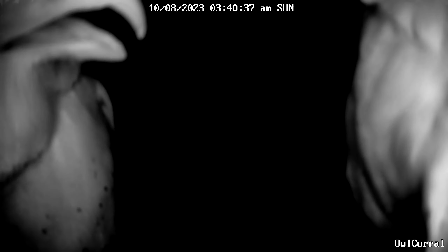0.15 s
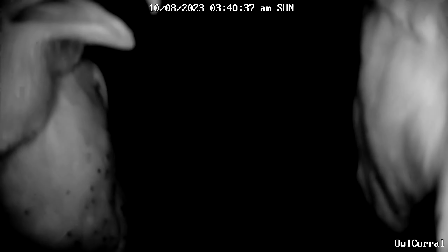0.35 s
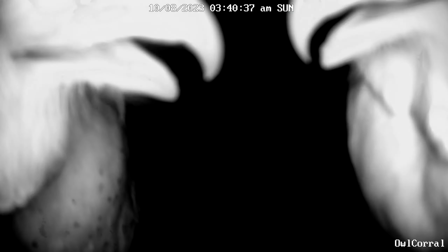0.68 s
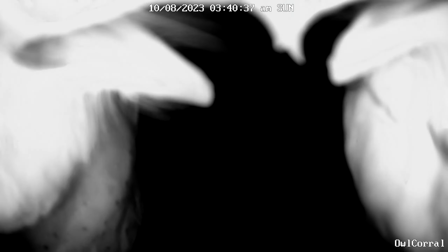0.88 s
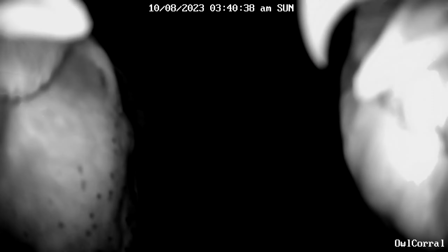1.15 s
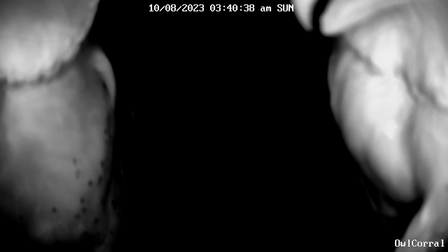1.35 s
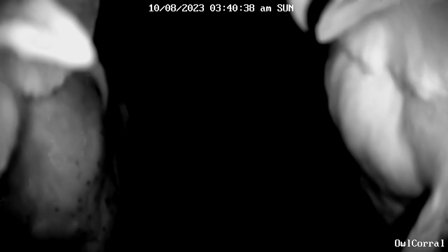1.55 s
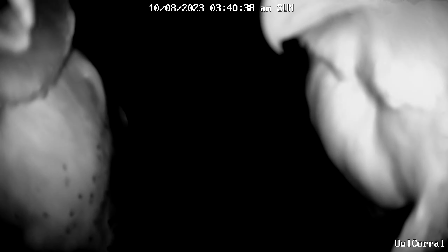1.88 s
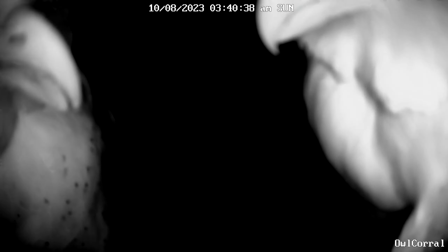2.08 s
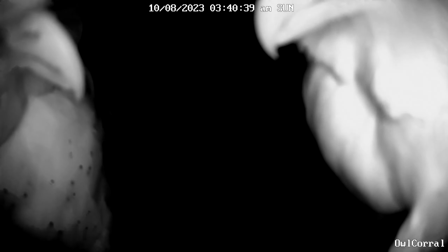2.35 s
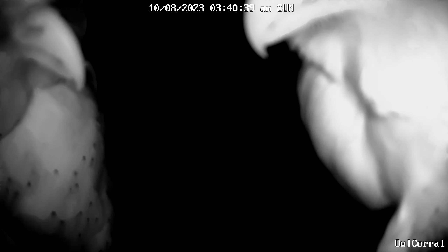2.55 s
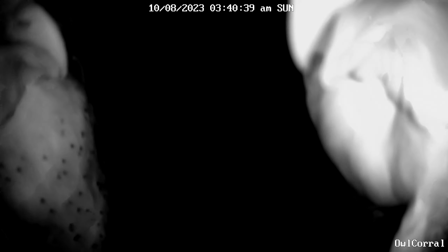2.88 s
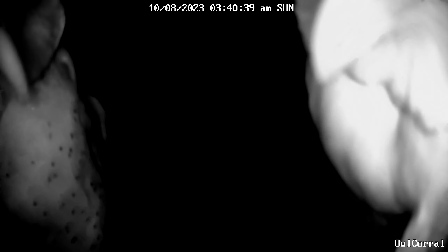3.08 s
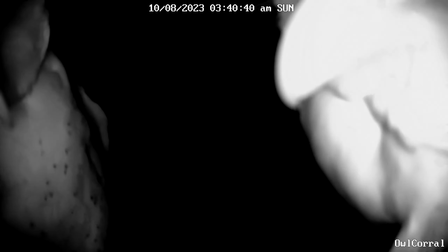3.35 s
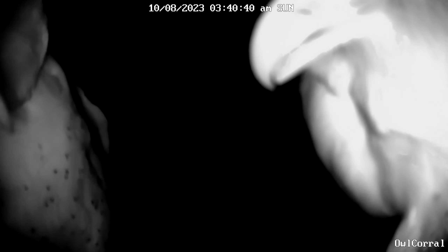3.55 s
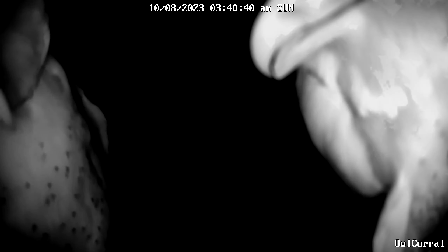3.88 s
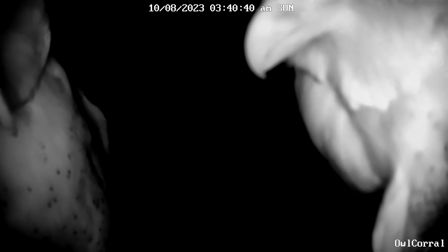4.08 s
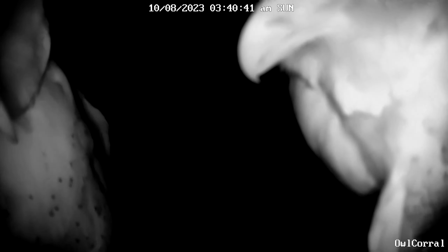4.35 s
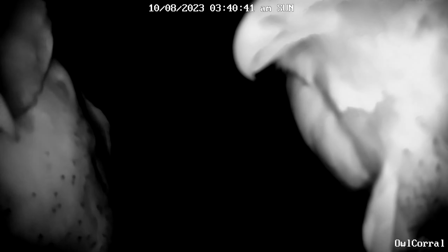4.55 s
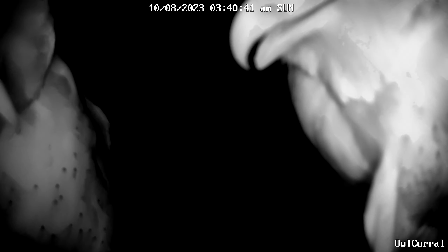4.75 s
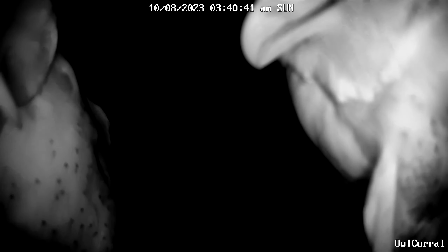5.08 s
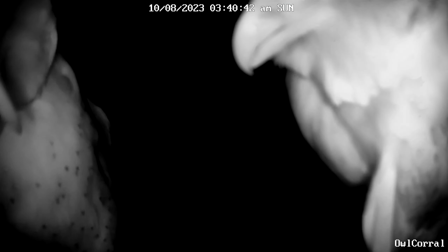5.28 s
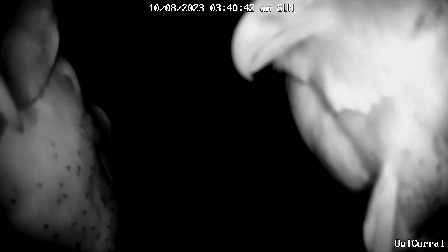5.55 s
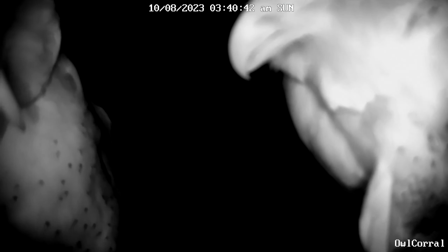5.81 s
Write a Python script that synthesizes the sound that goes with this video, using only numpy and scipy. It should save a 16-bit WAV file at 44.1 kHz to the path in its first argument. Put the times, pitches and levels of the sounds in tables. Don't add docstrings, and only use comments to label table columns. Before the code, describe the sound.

Inside a small wooden nest box, two owls jostle against a very close microphone. From 0 to 0.6 s, feathers scrape in crackly grains, claws tick, bodies bump with low thuds, and tiny mews and squeaks peep through; a bright snap and squeak land near 0.5. Scattered clicks and short squeaks follow at 0.7-0.9, with a heavy soft shove and piercing chirp around 1.0-1.1. From 1.2 to 2.2 s comes the loudest burst: clipped squeaks, low rising croaks, sharp bill cracks and hard knocks around 1.6-2.1, some overloading. Clicks with lower squeaks sound near 2.4 and 2.6. Then mostly faint hum, pulsing hiss and slight box movement. Small squeaks, clicks and feather brushes return at 3.8-4.2, with a sharp pop near 4.15, and fainter ones at 4.65 and 4.85. A tiny tick near 5.6 ends it. Dry, short boxy reverberation, muffled, switching treble.

```python
import sys
import numpy as np
from scipy import signal
from scipy.fft import rfft, irfft, next_fast_len
from scipy.io import wavfile
from scipy.ndimage import uniform_filter1d

SR = 44100
rng = np.random.default_rng(int(sys.argv[2]) if len(sys.argv) > 2 else 0)


def volts_from_db(level):
    exponent = np.asarray(level, float) / 20
    return 10 ** exponent


def dump_mix(stems):
    frames = np.atleast_2d(stems).T
    limited = np.clip(frames, -1, 1)
    pcm = np.round(limited * 32767).astype(np.int16)
    wavfile.write(sys.argv[1], SR, pcm)


N = 261513
TIME = np.arange(N) / SR

# (frequency [Hz], level [dB])
NIGHT = [(12, -24.5), (20, 2), (129, -7.5), (239, -19.5), (1360, -28.5), (7500, -36.5), (9000, -58.5),
         (19800, -120)]
# (from [s], to [s])
WIDE_SPANS = [(.530, .728), (1.297, 1.430), (1.745, 1.880), (2.132, 2.390), (2.449, 2.580), (2.643, 3.735),
              (3.859, 4.121), (4.178, 4.628), (4.690, 4.822), (4.882, 5.93)]
# (time [s], peak [dB])
SEAMS = [(.457, -55), (.520, -55), (1.2424, -53), (1.2482, -47), (1.2511, -47), (1.2975, -38),
         (1.4735, -58), (1.6175, -56), (1.634, -58), (4.181, -64)]
# (low edge [Hz], high edge [Hz])
EDGE_HZ = [3400, 4750]
# (frequency [Hz], level [dB])
HAZE = [(300, -15.5), (900, -1.0), (2000, 0), (4200, -5.5), (6000, -17), (9000, -25.5)]

# (time [s], panel peak [dB], box peak [dB])
KNOCKS = [
    (0.709, -38, -41),
    (1.993, -41.5, -44.5),
    (1.301, -40.5, -40),
    (1.6258, -12, -28),
    (1.7972, -14, -29.5),
    (2.1265, -17, -31),
    (1.093, -38, -45),
    (1.218, -38, -45),
    (1.437, -40, -45),
    (1.521, -36, -48),
]
# (time [s], panel peak [dB], box peak [dB])
SHOVES = [(0.036, -62, -47), (0.244, -40, -23.5), (0.337, -39, -32.5), (0.428, -36, -31), (0.534, -23, -26),
          (.548, -32, -25), (.728, -53.5, -40.5), (.795, -53, -46.5), (.9, -58, -46.5), (0.968, -24, -23),
          (0.979, -25, -17), (1.019, -41.5, -30.5), (1.067, -42, -46), (1.215, -39.5, -37.5),
          (1.436, -39, -35.5), (1.697, -29, -25), (3.82, -56, -59)]
# (frequency [Hz], level [dB], decay T60 [s])
HOUSING_MODES = [(268.4, 6, 0.09), (294, -5, 0.062), (215, -3, 0.05), (175, -8, .06), (406.2, -13, 0.12),
                 (507, -7.5, 0.046), (700, -17.5, 0.013), (1100, -12, 0.05), (1620, -20, 0.026)]
# (frequency [Hz], level [dB], decay T60 [s])
PANEL_MODES = [(280, 5, .09), (325, -2, .11), (178, -2, .13), (477, -7, .09)]
# (frequency [Hz], level [dB], decay T60 [s])
BOX_MODES = [(146, 8, 0.09), (118.7, -2, 0.16)]
# (time [s], held [s], level [dB])
SWAY = [(.04, .01, -41.5), (.25, .005, -29), (.4, 0.038, -45), (.58, 0.0077, -49.5), (.98, 0.036, -28.5),
        (1.09, 0.062, -39), (1.47, .005, -52), (1.66, 0.098, -22), (1.86, 0.072, -24),
        (2.16, 0.0099, -34.5), (2.06, .04, -54), (2.26, 0.18, -54.5), (2.7, 0.0048, -56)]
# (time [s], held [s], level [dB])
SETTLE = [
    (2.45, 0.22, -55),
    (3.55, 0.044, -63.5),
    (3.82, 0.0096, -64.5),
    (3.97, 0.2, -56.5),
    (4.5, 0.0081, -70.5),
    (4.66, 0.34, -63),
    (5.23, .7, -67),
]
# (frequency [Hz], level [dB])
ROCKING = [(20, -9), (40, -3.0), (75, -2.5), (125, 5.5), (170, -21.5), (350, -16.5), (600, -42.5)]

# (time [s], weight on the box [dB], feather drag [dB])
RUB = [(0, -31.5, -86.5), (.15, -41.5, -53.5), (.28, -44.5, -71), (.37, -39, -53.5), (.43, -40, -64.5),
       (0.554, -30, -56.5), (.64, -54, -73), (.81, -52, -67), (.93, -44.5, -75), (1.06, -34, -65.5),
       (1.13, -52, -72.5), (1.219, -42.5, -75), (1.35, -49, -63), (1.57, -41.5, -68), (1.718, -47, -58.5),
       (1.832, -31.5, -66), (2.05, -56.5, -76), (2.8, -75, -81)]
# (frequency [Hz], level [dB])
RUMBLE = [(15, -31.5), (25, -7), (124, -8), (185, -18), (340, -15.5), (700, -36), (910, -60.5),
          (1540, -120)]
# (frequency [Hz], level [dB])
RUSTLE = [(400, -15.5), (800, 7.5), (1200, 2.5), (2000, -10.5), (3000, -14.5)]
# (frequency [Hz], level [dB])
FIZZ = [(1500, -7), (2500, 4.5), (4500, 3), (6500, 3.5), (8000, -6), (9000, -26.5)]
# (time [s], held [s], level [dB], treble [dB])
SWEEPS = [
    (2.099, 0.014, -70, -65),
    (3.25, .11, -67, -71.5),
    (3.419, 0.11, -74, -85.5),
    (4.019, 0.0057, -72, -74.5),
    (4.069, 0.027, -65.5, -66.5),
    (5.0, 0.23, -78.5, -91.5),
    (5.29, 0.046, -72.5, -85),
    (5.37, 0.036, -66.5, -86),
]
# (time [s], held [s], level [dB], treble [dB])
FLICKS = [(1.307, 0.058, -61.5, -44.5), (1.524, 0.025, -77, -68), (1.678, 0.027, -59, -71),
          (1.745, 0.033, -65, -51), (2.132, 0.058, -54, -81), (3.545, 0.0052, -62, -86),
          (3.865, 0.028, -70, -63), (4.14, 0.0041, -54.5, -65), (4.19, .005, -83.5, -89),
          (4.482, 0.017, -69, -91), (4.9, 0.0036, -72, -77), (5.612, 0.018, -65, -87)]
# (frequency [Hz], level [dB])
HOLLOW = [(500, -17.5), (750, -1.5), (1000, 4.0), (1300, -3.0), (1900, -5.5), (2900, -16.0)]
# (time [s], held [s], level [dB], band centre [Hz])
RASPS = [(.03, 0.0035, -58, 3200), (.088, 0.01, -55.5, 1850), (.19, 0.016, -52.5, 2600),
         (.33, 0.0089, -49, 2980), (0.383, 0.0064, -52, 2200), (0.42, .016, -60.5, 3800),
         (.56, 0.018, -57, 1500), (0.871, 0.013, -60, 4000), (1.475, 0.012, -51, 3250),
         (1.528, 0.018, -44, 3800), (1.63, 0.0049, -38.5, 1184), (1.315, .06, -54, 1700),
         (1.69, .03, -52.5, 3900), (1.75, 0.0077, -48, 2200), (2.137, 0.024, -63.5, 2400),
         (3.864, 0.063, -72, 2580), (3.865, 0.053, -71, 1300), (4.07, 0.041, -63, 2640),
         (.533, 0.0074, -44.5, 5400), (.557, .012, -51, 5800), (.54, 0.049, -60.5, 4300),
         (1.008, .008, -59.5, 3000), (.972, .006, -56, 2000), (0.743, 0.0033, -43, 5200),
         (0.798, 0.0036, -46, 4800), (1.40, 0.014, -48, 6000), (2, 0.059, -69.5, 1600),
         (.22, 0.042, -58.5, 1240), (.44, 0.0096, -57.5, 2540), (1.927, 0.012, -57, 2680),
         (1.997, 0.013, -52, 3800), (1.999, 0.0075, -54.5, 2000), (1.915, 0.0048, -46, 1700),
         (1.525, .012, -50.5, 1604), (1.748, 0.0061, -50, 6980), (4.481, 0.012, -60, 830),
         (5.612, 0.022, -64, 910), (4.66, 0.01, -52, 2100)]

# (time [s], peak [dB], dull part [dB])
SNAPS = [(.128, -44, -37), (0.184, -44.5, -31.5), (0.4536, -30, -31.5), (0.4592, -22, -22),
         (0.5256, -16, -27.5), (1.0934, -22.5, -18.5), (1.4102, -26, -50), (1.7384, -21, -32.5),
         (1.7954, -28, -17), (1.849, -46, -50), (1.994, -23, -24.5), (2.1245, -30.5, -22.5),
         (2.423, -16, -19.5), (2.6047, -44, -29.5), (3.8241, -48, -34.5), (3.8574, -27, -37),
         (3.865, -59, -42), (4.0437, -47.5, -41), (4.1556, -25.5, -24), (4.6702, -73, -38)]
# (time [s], peak [dB], dull part [dB])
TICKS = [(0.0403, -57, -41), (0.0566, -46, -30), (0.1453, -30.5, -29), (0.3043, -48, -46), (.385, -51, -43),
         (0.39, -49, -49), (0.5044, -41.5, -40.5), (0.7135, -58.5, -34.5), (0.7929, -43, -40),
         (0.8645, -33.5, -30.5), (0.9697, -47, -43.5), (1.0678, -51, -51), (1.1653, -83, -72),
         (1.3042, -20.5, -35.5), (1.4003, -41.5, -68.5), (1.5206, -26, -35.5), (1.5815, -70, -47.5),
         (1.6242, -24, -14.5), (1.6766, -26, -32.5), (2.0576, -76, -75), (2.6131, -25.5, -35),
         (3.5432, -75, -57), (4.48, -78, -56.5), (4.866, -41.5, -43.5), (5.6106, -75.5, -60)]
# (time [s], peak [dB], dull part [dB])
STROKES = [(0.0044, -56, -40), (0.0248, -31, -35), (0.09, -57, -38.5), (0.124, -42.5, -33.5),
           (0.1966, -45, -36), (0.209, -50, -44.5), (0.3255, -24.5, -27.5), (0.34, -44.5, -39),
           (0.349, -48, -60), (0.3635, -58, -55), (0.4417, -48.5, -33.5), (0.49, -55, -55),
           (0.5545, -68.5, -26.5), (0.845, -36.5, -33), (0.875, -58, -28.5), (0.904, -53, -42.5)]
# (frequency [Hz], level [dB])
BRIGHT = [(1200, -4.5), (1900, -2.5), (3000, 1), (4500, 3), (7000, -3.0), (9000, -23.0)]
# (frequency [Hz], level [dB])
DULL = [(130, -30.5), (300, 0.5), (600, -6.0), (1200, 6.0), (2000, -12.5), (3000, -29.5)]
# (time [s], peak [dB], width [ms])
PULLS = [
    (.1848, -20, 0.1),
    (.4600, -41.5, 0.53),
    (1.9945, -19, 0.21),
]
# (time [s], peak [dB], width [ms])
PUSHES = [(.0580, -31, 0.57), (.7125, -25, 0.54), (.7152, -24.5, 0.49), (1.4012, -43, 0.27),
          (1.5825, -36, 0.34), (2.058, -46.5, 0.38), (3.545, -47.5, 0.11), (3.8238, -37.5, 0.44),
          (3.9195, -50, 0.63), (4.1561, -12, 0.12), (4.482, -53.5, 0.34), (4.8690, -36, 0.083),
          (5.612, -51, 0.31)]
# (time [s], peak [dB], width [ms])
CRACKS = [
    (1.3045, -10.5, 0.11),
    (1.5215, -8.5, 0.12),
    (1.6245, -11.5, 0.13),
    (1.6772, -18.5, 0.15),
    (1.7384, -9, 0.11),
    (1.7957, -12.5, .06),
    (2.1252, -17, 0.12),
    (2.2008, -27, 0.19),
]

# (centre time [s], length [ms], middle pitch [Hz], peak [dB])
CROAKS = [
    (1.2201, 8, 1096, -19),
    (1.4397, 7.8, 1100, -18),
    (1.655, 8.4, 1117, -15),
    (1.9009, 8, 1131, -19),
    (2.1839, 8.2, 1416, -19),
    (2.3977, 6.1, 1080, -23),
    (2.5899, 6.15, 1075, -22),
    (4.8475, 6.9, 1136, -26),
]
# (centre time [s], length [ms], middle pitch [Hz], peak [dB])
LIFTS = [(.437, 3.7, 2220, -42), (.528, 6.5, 4180, -15), (1.247, 6.3, 3256, -7.5), (1.3064, 3.5, 3774, -6),
         (1.4666, 5.2, 3100, -11.5), (1.5233, 3.8, 3700, -2.2), (1.9036, 7.9, 2540, -27),
         (1.908, 6.7, 2970, -28.5), (1.9956, 3.6, 2980, -16), (2.202, 3.2, 1782, -28.5),
         (4.047, 12.7, 3010, -36), (4.861, 16, 2750, -31.5)]
# (centre time [s], length [ms], middle pitch [Hz], peak
# [dB])
HOLDS = [(.077, 20, 4460, -52), (.405, 7.2, 4300, -38), (.4645, 11, 4440, -19), (.5338, 9.2, 4740, -16.5),
         (.7786, 5.9, 2120, -44), (.8663, 6.3, 3310, -16.5), (1.0957, 3.8, 3640, -6),
         (1.9135, 11, 3080, -19), (1.9205, 8.1, 2930, -14), (2.4196, 4, 2033, -16.5),
         (2.4228, 9.7, 1492, -17.5), (2.61, 10, 2380, -20), (3.786, 9.4, 2615, -32),
         (3.7945, 9.2, 2466, -24), (3.8486, 14, 3570, -31.5), (3.858, 6, 4230, -25), (4.054, 12, 6300, -55),
         (3.863, 5, 5500, -39.5), (3.863, 5, 7200, -41), (2.4047, 6, 2350, -42.5), (4.056, 16, 3110, -34),
         (4.151, 9.2, 3132, -28), (4.664, 16.3, 2770, -35.5), (4.675, 8.9, 2654, -28.5),
         (4.8709, 20, 2906, -32.5)]
# (centre time [s], length [ms], middle pitch [Hz], peak [dB])
DROOPS = [(.1474, 14, 4330, -32.5), (.2852, 5, 3370, -47), (1.41, 9.4, 4440, -28.5), (1.416, 9, 3800, -38),
          (1.4222, 8, 3275, -25.5), (1.4175, 13, 7130, -31.5), (4.065, 6.2, 5640, -44.5),
          (.492, 20, 3900, -53), (1.6253, 4, 4100, -15), (1.745, 9, 3826, -21.5), (2.1258, 4, 4000, -10),
          (2.4142, 9.5, 2410, -21.5), (2.6036, 9.6, 2420, -25.5), (3.8417, 13.8, 4083, -32.5),
          (3.858, 7.35, 1484, -24.5), (4.0645, 8, 2803, -26), (4.143, 8.3, 3540, -38),
          (4.158, 8, 2463, -24), (4.879, 10.7, 2257, -35), (4.886, 7.3, 1600, -42)]
# (centre time [s], length [ms], middle pitch [Hz], peak [dB])
DIVES = [
    (.742, 7.5, 3300, -31.5),
    (.801, 5.7, 2860, -17.5),
    (1.0325, 9.9, 3555, -17.5),
    (1.2415, 10.7, 3880, -28),
    (1.4616, 7.1, 4020, -23),
    (1.9245, 4.5, 2265, -23.5),
    (2.6181, 4.8, 1752, -13.5),
    (3.8567, 10.2, 3090, -20.5),
    (4.067, 3.8, 2520, -27.5),
]
# (centre time [s], length [ms], middle pitch [Hz], peak [dB])
MEWS = [(.011, 21, 977, -41.5), (.0445, 5.7, 995, -31), (.0585, 5.7, 854, -30), (.130, 7, 1100, -39),
        (.148, 8, 1100, -42), (.175, 9.7, 915, -35), (.307, 5.7, 840, -36), (.332, 12, 924, -37.5),
        (.392, 10, 896, -36.5), (.527, 5.1, 1140, -22), (.541, 5.8, 750, -27.5), (.729, 16, 1480, -56.5),
        (.894, 8.4, 1296, -48), (.91, 14, 880, -49.5), (1.45, 7.7, 1223, -39), (2.130, 12.6, 1138, -22),
        (2.130, 7.2, 1694, -25.5), (2.1875, 7.1, 1460, -32), (2.422, 8.6, 392, -33),
        (3.768, 8.6, 945, -54.5), (3.788, 9, 1001, -44), (4.0344, 8.8, 987, -39.5),
        (4.644, 5.7, 950, -53.5), (4.661, 5, 960, -45), (4.671, 8, 910, -48.5)]
# (centre time [s], length [ms], middle pitch [Hz], peak [dB])
YAPS = [
    (1.7407, 5.2, 3600, -3.4),
]
# (notes, end over start pitch [ratio], how soon the glide levels off [exponent],
# overtones [dB], place of the peak [exponent, small = early])
KINDS = [
    (CROAKS, 1.9, 2, 0, 1.3),
    (LIFTS, 1.12, 1, 0, 1),
    (HOLDS, .98, 1, 0, 1),
    (DROOPS, .83, 1, 0, 1),
    (DIVES, .55, 1, 0, 1.4),
    (MEWS, 1.25, 2, -14, 1),
    (YAPS, 1.12, 1, 0, .58),
]
# (pitch [Hz], step between overtones [dB])
OVERTONES = [(1100, -8.5), (2400, -22.5), (3300, -36.5)]
# (frequency [Hz], level [dB])
BREATH = [(500, -8.0), (1200, -3.5), (2500, 0), (4500, -7.0), (9000, -30.5)]
# (low edge [Hz], high edge [Hz])
ECHO_HZ = [1300, 1750]


def colour(x, shape):
    hz, db = np.transpose(shape)
    size = next_fast_len(len(x))
    bins = np.maximum(np.fft.rfftfreq(size, 1 / SR), 1)
    gain = volts_from_db(np.interp(np.log(bins), np.log(hz), db, left=-90, right=-90))
    y = irfft(rfft(x, size) * gain, size)[:len(x)]
    return y / np.sqrt(np.mean(y ** 2))


def band_filter(x, order, hz, kind="bandpass"):
    return signal.sosfilt(signal.butter(order, hz, kind, fs=SR, output="sos"), x)


def walk(rate):
    k = int(SR / rate)
    held = np.repeat(rng.standard_normal(N // k + 1), k)[:N]
    return 0.79 * uniform_filter1d(held, k)


def mottled(x, shape, patchy_db, rate):
    out = 0
    for hz in 500 * 2 ** np.arange(0, 4.5, .5):
        band = band_filter(x, 2, [hz / 2 ** .25, hz * 2 ** .25])
        out = out + volts_from_db(patchy_db * walk(rate)) * band
    return colour(out, shape)


def add(out, s, sound):
    i = int(s * SR)
    out[i:i + len(sound)] += sound[:N - i]


def swells(rows, rise_db_s, fall_db_s):
    gain = 0
    for s, held, db in rows:
        rise_db = rise_db_s * np.maximum(s - TIME, 0)
        fall_db = fall_db_s * np.maximum(TIME - s - held, 0)
        gain = gain + volts_from_db(db - rise_db - fall_db)
    return gain


def ring(modes):
    t = TIME[:SR // 2]
    return sum(volts_from_db(db - 60 * t / t60) * np.sin(2 * np.pi * hz * t) for hz, db, t60 in modes)


def pulse(u, rebound=1):
    return (1 - rebound * u ** 2) * np.exp(-u ** 2 / 2)


def night(level_db=-69.5, tick_db=7, first_s=.34, period_s=.1333):
    since = (TIME - first_s) % 1 % period_s
    ticks = np.exp(-((since - .006) / 0.0073) ** 2)
    noise = colour(rng.standard_normal(N), NIGHT)
    treble = band_filter(noise, 2, 3500, "highpass")
    return volts_from_db(level_db) * (noise + volts_from_db(tick_db) * ticks * treble)


def seams(width_ms=.04):
    u = (np.arange(64) - 32) / SR * 1000 / width_ms
    out = np.zeros(N)
    for s, db in SEAMS:
        add(out, s - 32 / SR, volts_from_db(db) * pulse(u))
    return out


def treble_haze(x, before_s=.012, after_s=.040, fall_db=-15, spread_db=-33.5, edge_db=-24):
    power = band_filter(x, 4, 700, "highpass") ** 2
    top_power = band_filter(x, 3, EDGE_HZ) ** 2
    before, after = int(before_s * SR), int(after_s * SR)
    lead = volts_from_db(-14.5) * np.hanning(2 * before)[:before]
    hold = np.concatenate([lead, volts_from_db(np.linspace(0, 2 * fall_db, after))])
    held = np.sqrt(np.abs(signal.fftconvolve(power, hold / hold.sum())[before:before + N]))
    framed = np.sqrt(np.abs(uniform_filter1d(top_power, 2 * before)))
    spread = colour(rng.standard_normal(N), HAZE)
    edge = np.sqrt(2) * np.sin(2 * np.pi * np.cumsum(4540 + 90 * walk(300)) / SR)
    return volts_from_db(spread_db) * held * spread + volts_from_db(edge_db) * framed * edge


def knocks(knock_rise_s=0.0019, shove_rise_s=0.0071, sway_hz=74):
    out = np.zeros(N)
    for blows, rise_s, modes in ((KNOCKS, knock_rise_s, HOUSING_MODES), (SHOVES, shove_rise_s, PANEL_MODES)):
        swell = (1 - np.exp(-TIME[:SR // 2] / rise_s)) ** 2
        for s, panel_db, box_db in blows:
            panel = volts_from_db(panel_db - 0.5) * ring(modes)
            box = volts_from_db(box_db + 4.5) * ring(BOX_MODES)
            add(out, s, swell * (panel + box))
    phase = 2 * np.pi * np.cumsum(sway_hz * (1 + .045 * walk(30))) / SR
    sway = np.sqrt(2) * np.sin(phase)
    return out + swells(SWAY, rise_db_s=348, fall_db_s=238) * sway


def rubbing(grains_per_s=2600, scatter_db=2.2, fizz_level_db=-66.5, fizz_slope=1.3, drag_mid_db=-64):
    s, weight_db, drag_db = np.transpose(RUB)
    rumble_db = np.interp(TIME, s, weight_db, right=-120)
    rustle_db = np.interp(TIME, s, drag_db, right=-120)
    fizz_db = fizz_level_db + fizz_slope * (rustle_db - drag_mid_db)
    chance, size = rng.random(N), rng.exponential(size=N)
    noise = rng.standard_normal((3, N))
    slips = (chance < grains_per_s / SR) * volts_from_db(scatter_db * size) * noise[0]
    grains = slips + 0.16 * noise[1]
    rustle = volts_from_db(rustle_db + 3) * mottled(grains, RUSTLE, 2.5, 90)
    fizz = volts_from_db(fizz_db + 4) * mottled(grains, FIZZ, 2.0, 110)
    catch = volts_from_db(2.2 * walk(60))
    rumble = volts_from_db(rumble_db - 2.5 + 8.9 * walk(18)) * colour(noise[2], RUMBLE)
    return catch * (rustle + fizz) + rumble


def sweep_gain(column):
    columns = [0, 1, column]
    slow = swells(np.array(SWEEPS)[:, columns], rise_db_s=351.5, fall_db_s=283)
    sudden = swells(np.array(FLICKS)[:, columns], rise_db_s=4000, fall_db_s=350)
    return slow + sudden


def sweeps():
    hollow = mottled(rng.standard_normal(N), HOLLOW, 1.2, 25)
    hiss = mottled(rng.standard_normal(N), FIZZ, 1.0, 40)
    rocking = colour(rng.standard_normal(N), ROCKING)
    settling = swells(SETTLE, rise_db_s=62.5, fall_db_s=113) * rocking
    return sweep_gain(2) * hollow + sweep_gain(3) * hiss + settling


def rasps(scatter_db=3, width=0.22):
    grains = rng.standard_normal(N) * volts_from_db(scatter_db * walk(500))
    out = np.zeros(N)
    near, far = 1 + width, 1 + 3 * width
    for s, held, db, hz in RASPS:
        i, j = int(max(s - .02, 0) * SR), int((s + held + .1) * SR)
        shape = [(hz / far, -20), (hz / near, -3), (hz, 0), (hz * near, -3), (hz * far, -20)]
        gain = swells([(s, held, db)], rise_db_s=3000, fall_db_s=902.5)[i:j]
        add(out, i / SR, colour(grains[i:j], shape) * gain)
    return out


def pops(rebound=0.86):
    t = (np.arange(512) - 256) / SR
    out = np.zeros(N)
    for rows, way, back in ((PULLS, -1, rebound), (PUSHES, 1, rebound), (CRACKS, -1, 1)):
        for s, db, ms in rows:
            add(out, s + t[0], way * volts_from_db(db) * pulse(t * 1000 / ms, back))
    return out


def snaps(snap_t60_s=0.0041, tick_t60_s=0.018, stroke_t60_s=0.052):
    out = np.zeros(N)
    t = TIME[:2048]
    hits = [(*row, snap_t60_s, 0.0004) for row in SNAPS]
    hits += [(*row, tick_t60_s, 0.0004) for row in TICKS]
    hits += [(s, db - 22.5, dull_db - 16.0, stroke_t60_s, 0.003) for s, db, dull_db in STROKES]
    for s, db, dull_db, t60, rise_s in hits:
        noise = rng.standard_normal((2, len(t)))
        bright = volts_from_db(db + 3.0) * colour(noise[0], BRIGHT)
        dull = volts_from_db(dull_db + 0.5) * colour(noise[1], DULL)
        rise = np.minimum(t / rise_s, 1)
        add(out, s, (bright + dull) * rise * volts_from_db(-30 * t / t60))
    return out


def call(ms, hz, glide, bend, pure_db, early, round_ms=9.7, even_ms=9):
    start_hz = hz / (1 + (glide - 1) * (1 - .5 ** bend))
    end_hz = glide * start_hz
    overtone_db = pure_db + np.interp(hz, *np.transpose(OVERTONES))
    t = np.linspace(0, 1, int(ms * SR / 1000))
    phase = 2 * np.pi * np.cumsum(start_hz + (end_hz - start_hz) * (1 - (1 - t) ** bend)) / SR
    lateness = early * np.clip(ms / even_ms, .95, 1.4)
    roundness = np.clip(round_ms / ms, .7, 2) * min(early, 1) ** 2
    swell = np.abs(np.sin(np.pi * t ** lateness)) ** roundness
    return swell * sum(volts_from_db(overtone_db * k) * np.cos((k + 1) * phase) for k in range(4))


def chitter(rough=0.1, breath_db=-22):
    out = np.zeros(N)
    flutter = walk(900)
    for notes, *kind in KINDS:
        for s, ms, hz, db in notes:
            add(out, s - ms / 2000, volts_from_db(db) * call(ms, hz, *kind))
    swell = uniform_filter1d(np.abs(out), size=64)
    breath = colour(rng.standard_normal(N), BREATH)
    return out * (1 + rough * flutter) + volts_from_db(breath_db) * 2 * swell * breath


def scene(walls_t60_s=0.022, walls_db=-14.5, echo_s=.032, echo_db=-32.5):
    near = chitter() + snaps() + pops()
    t = TIME[:SR // 4]
    walls = rng.standard_normal(len(t)) * volts_from_db(-60 * t / walls_t60_s) * np.minimum(t / 0.0019, 1)
    tail = signal.fftconvolve(near, walls / np.sqrt(np.sum(walls ** 2)))[:N]
    echo = band_filter(np.roll(near, int(echo_s * SR)), 2, ECHO_HZ)
    box = near + volts_from_db(walls_db) * tail + volts_from_db(echo_db) * echo
    return (box + knocks() + rubbing() + sweeps() + night() + rasps())[None]


def band_limit(x):
    return signal.sosfilt(signal.butter(12, 16460, fs=SR, output="sos"), x)


def record(dry, narrow_hz=4620, wide_hz=8600, full_scale=.715):
    def lowpass(x, taps, hz, window="hamming"):
        return signal.fftconvolve(x, signal.firwin(taps, hz, window=window, fs=SR), "same")

    hazy = dry[0] + treble_haze(dry[0])
    narrow = lowpass(hazy, 1061, narrow_hz, ("kaiser", 6.5))
    wide = lowpass(hazy, 1061, wide_hz, ("kaiser", 6.5))
    on = sum(1. * (TIME > a) * (TIME < b) for a, b in WIDE_SPANS)
    link = narrow + uniform_filter1d(on, size=128) * (wide - narrow) + seams()
    flattened = lowpass(np.clip(link, -full_scale, full_scale), 257, 16200)
    return band_limit(flattened[None])


dry = scene()
out = record(dry)
dump_mix(out)
```